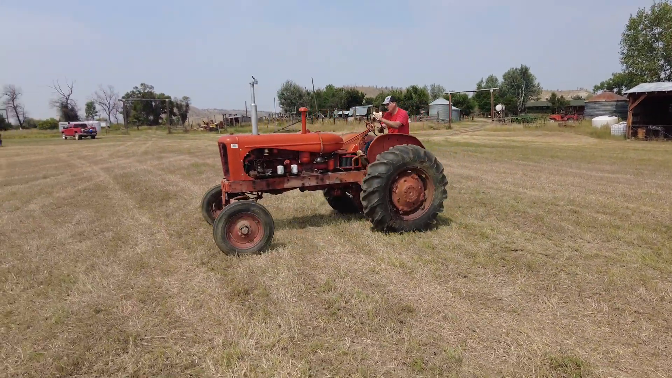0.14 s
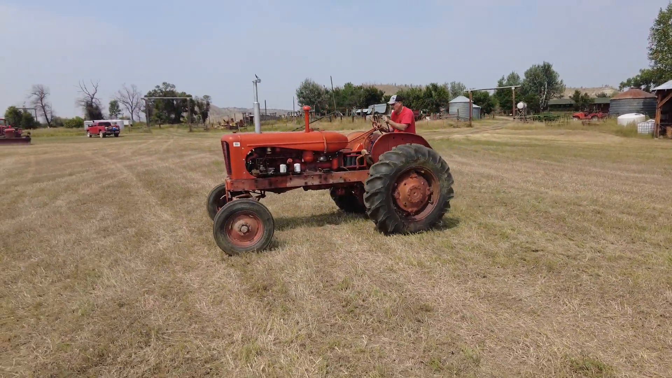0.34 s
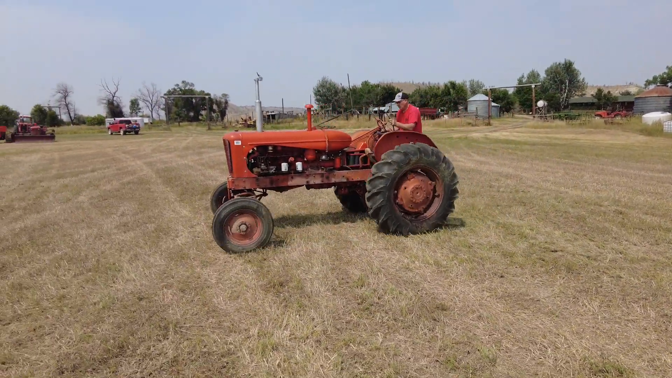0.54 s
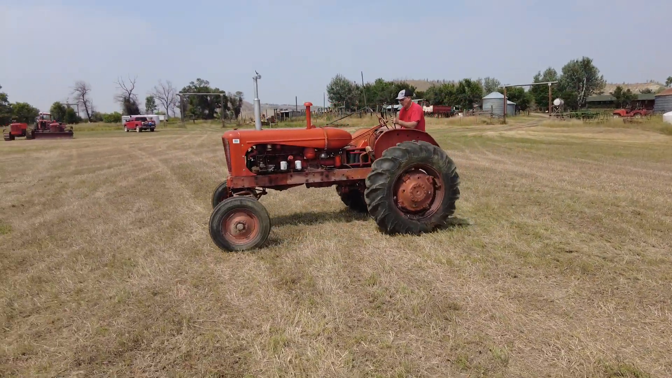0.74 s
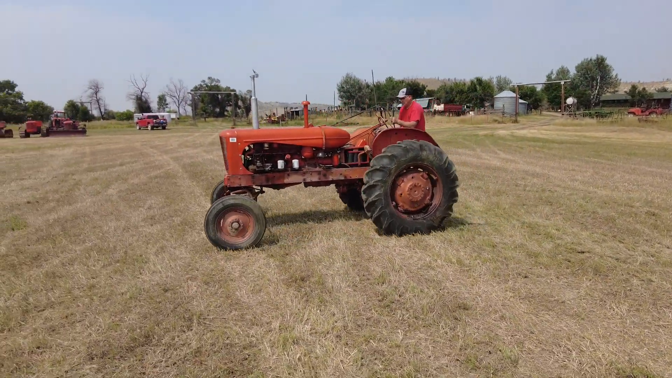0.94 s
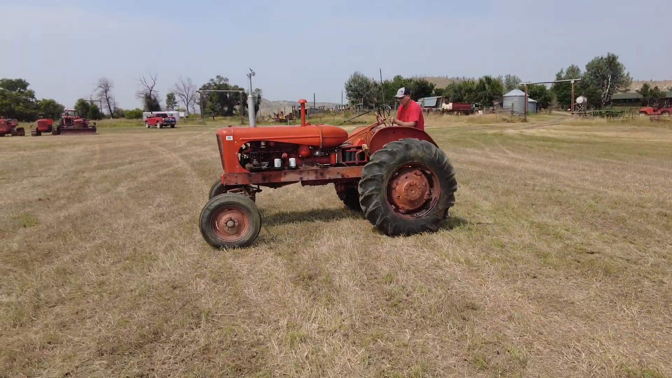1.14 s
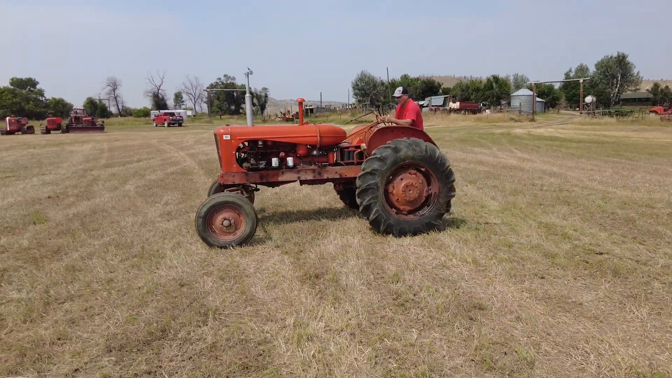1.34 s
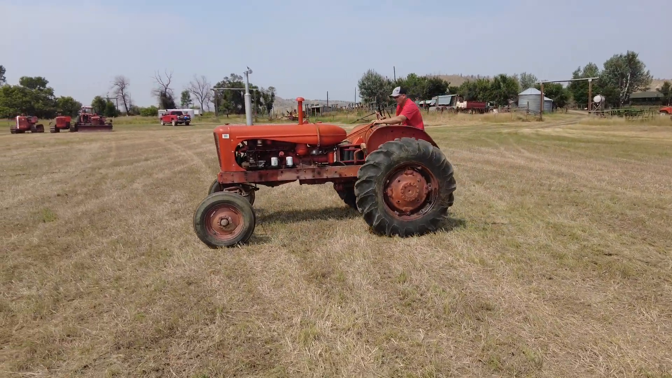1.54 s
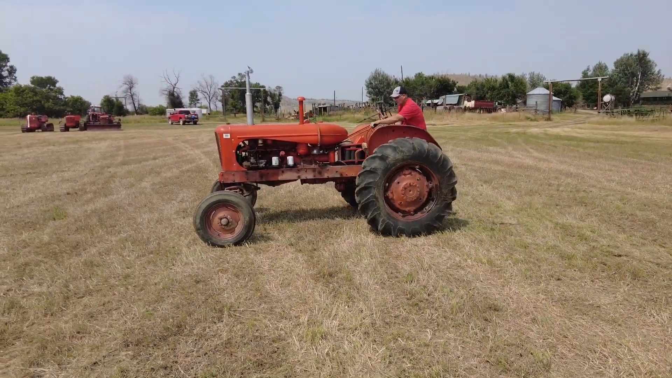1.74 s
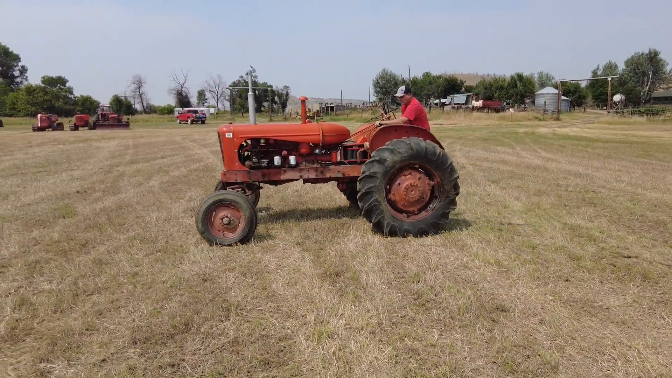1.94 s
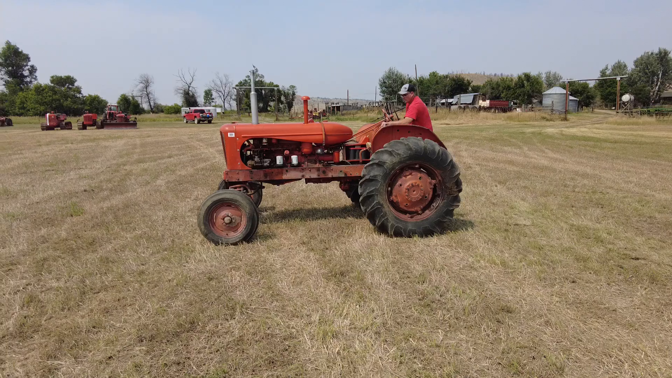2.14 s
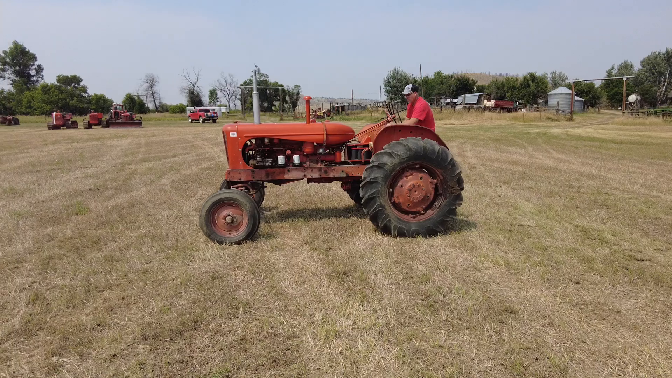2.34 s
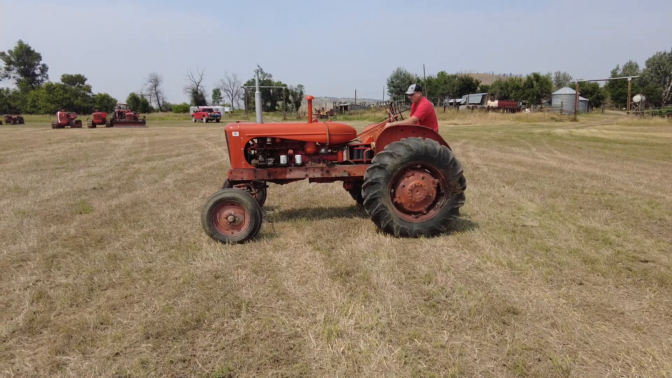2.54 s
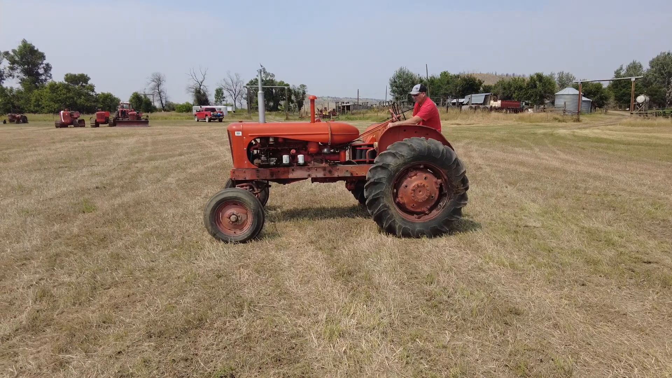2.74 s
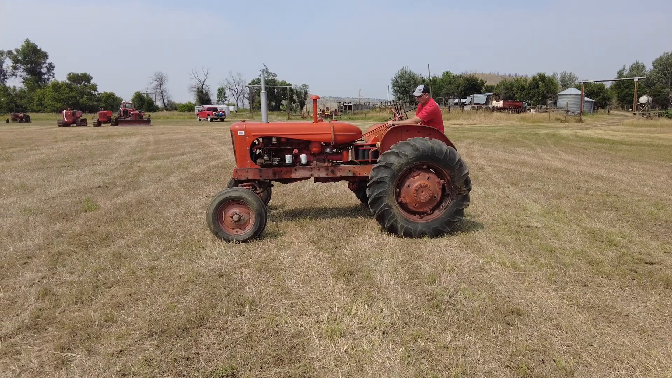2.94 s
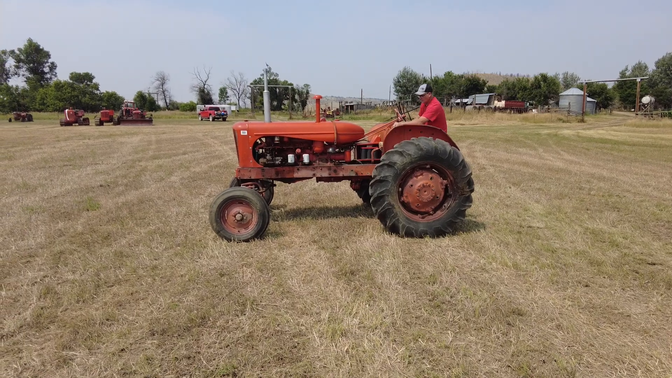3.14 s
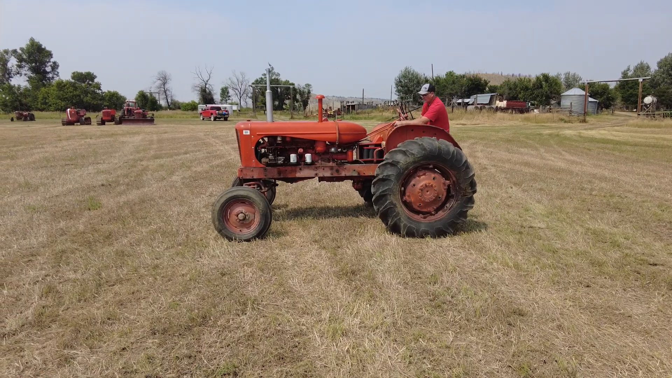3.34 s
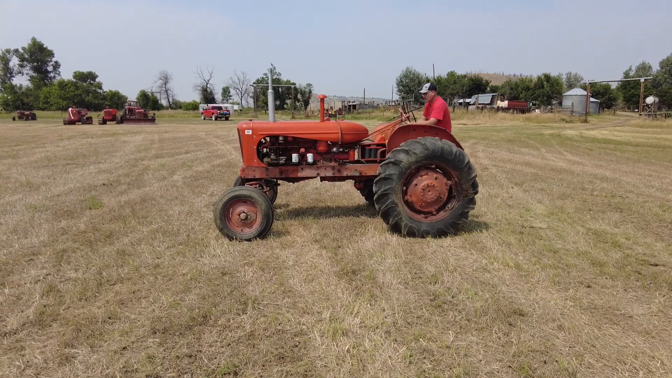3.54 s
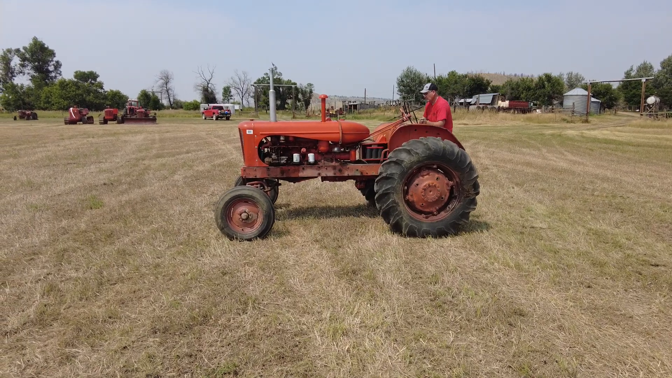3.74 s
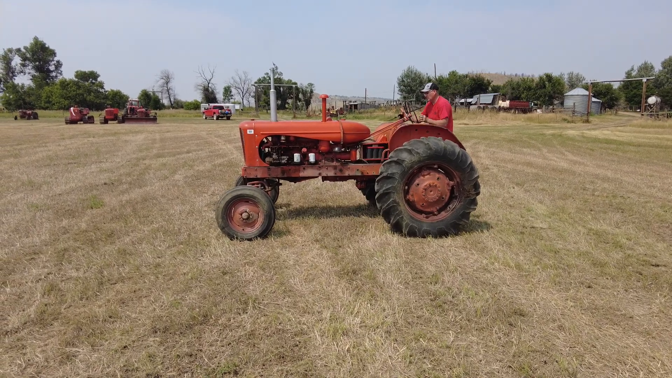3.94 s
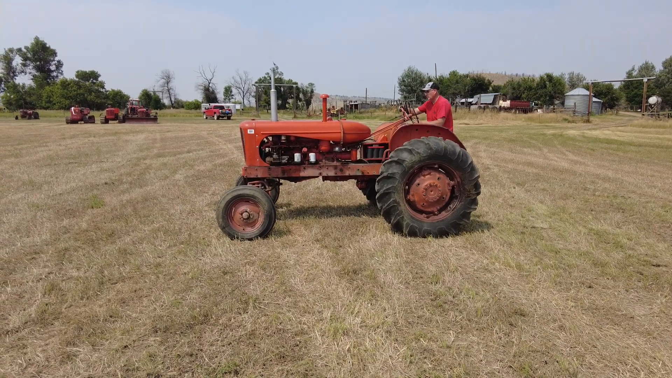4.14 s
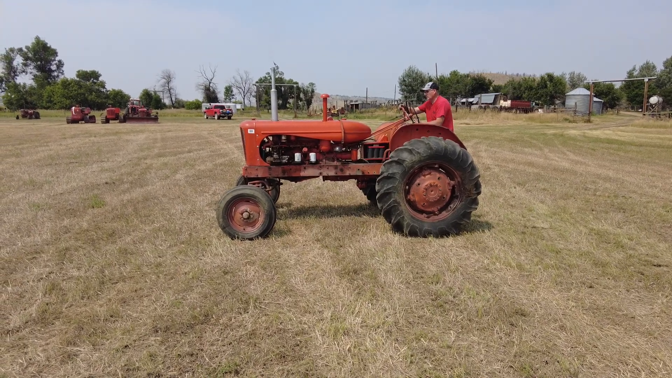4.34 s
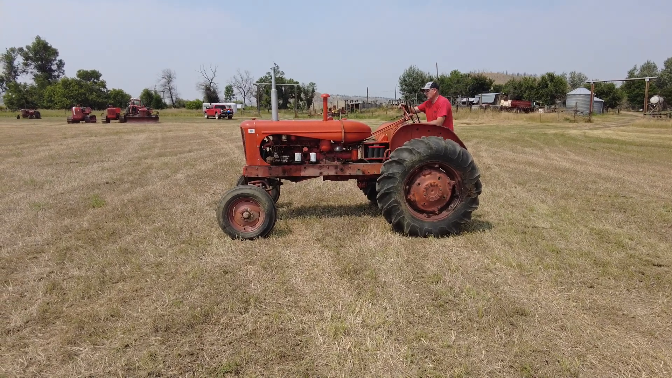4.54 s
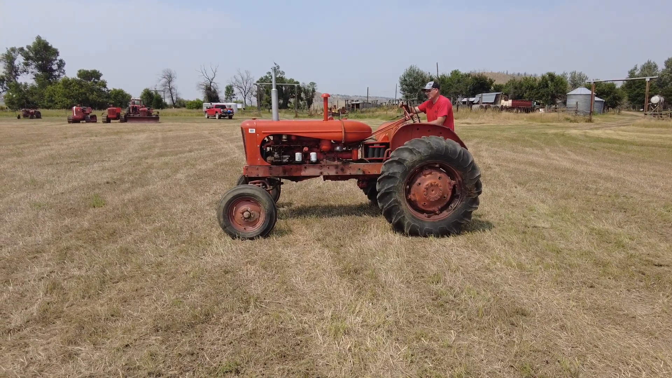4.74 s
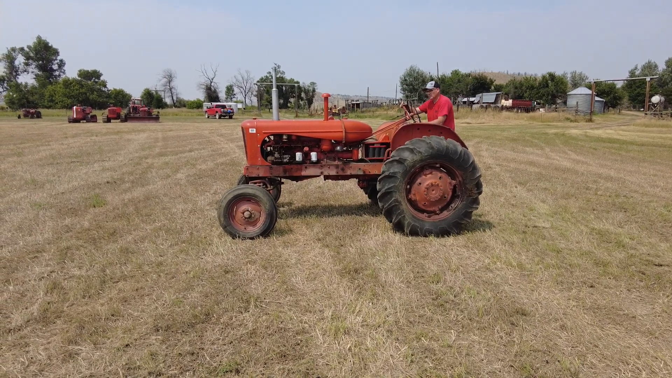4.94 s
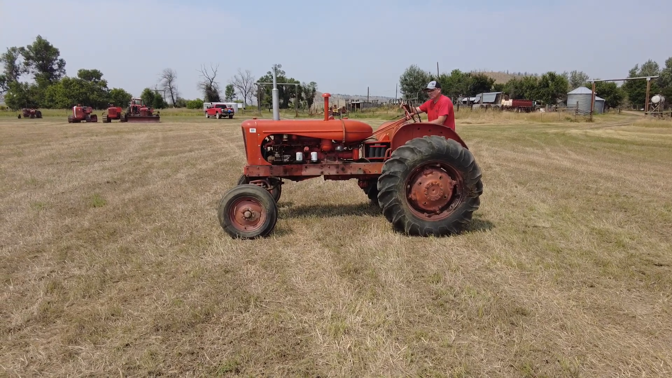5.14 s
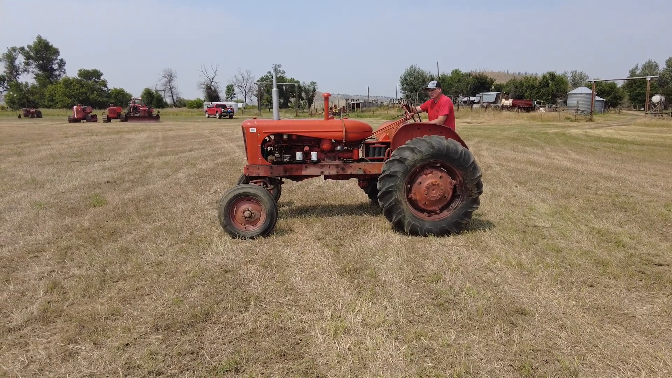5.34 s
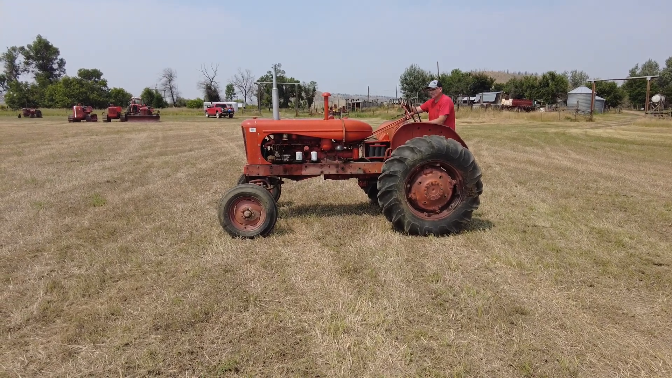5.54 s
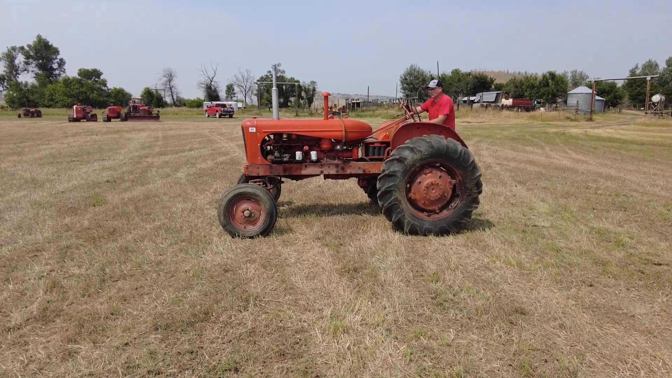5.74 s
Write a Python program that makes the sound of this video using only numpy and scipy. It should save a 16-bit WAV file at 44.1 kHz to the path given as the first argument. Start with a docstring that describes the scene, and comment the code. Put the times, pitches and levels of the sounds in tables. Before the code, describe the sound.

Fast, even engine chugging with hollow exhaust puffs and dense valve clatter, a few small metal chirps at the start. The speed holds, dips briefly just before four seconds, swells as it picks up, and cuts off at about four and a half. The crank then winds down, pumping air and clacking unevenly with dull driveline knocks. Open air, no echo, steady microphone distance.

```python
"""Old six-cylinder tractor, switched off

One crank drives it all: the exhaust throbs as sine lines on the cycle rate, over coloured gas noise.
Block, valve gear and light metal are noise bursts at fixed crank angles; a leaky gasket spits once a cycle.
The engine labours briefly, picks up again, then is switched off.
It runs down, the pistons pumping air and clacking one by one, with a few dull clunks and chirping fittings.
"""
import sys
import numpy as np
from scipy import signal
from scipy.fft import rfft, irfft, next_fast_len
from scipy.io import wavfile
from scipy.ndimage import uniform_filter1d

SR = 44100
rng = np.random.default_rng(int(sys.argv[2]) if len(sys.argv) > 2 else 0)


def master_out(mix):
    """Clip the mix to full scale and print it as 16-bit PCM to the path in sys.argv[1]."""
    frames = np.transpose(np.atleast_2d(mix))
    ceiling = np.clip(frames, -1, 1)
    pcm = np.round(ceiling * 32767).astype(np.int16)
    wavfile.write(sys.argv[1], SR, pcm)


N = 259704
T = np.arange(N) / SR

SET_RPM = 1045  # speed at which pace() is 0 dB
OFF_S, OFF_FADE_S = 4.54, 0.07  # switch-off, and time constant of the dying firings


def undb(db):
    """Decibels to gain."""
    return 10 ** (np.asarray(db) / 20)


def unit(x):
    """Scale to rms 1."""
    return x / np.sqrt(np.mean(x ** 2))


def noise():
    """White noise."""
    return rng.standard_normal(N)


def walk(rate):
    """Smooth random wander with rms 1, taking `rate` new values a second."""
    hold = int(SR / rate)
    steps = np.repeat(rng.standard_normal(N // hold + 1), hold)
    return unit(uniform_filter1d(steps, hold)[:N])


def response(x, gain_of_hz):
    """Filter by a gain that is a function of frequency."""
    size = next_fast_len(N + 8192)
    f = np.maximum(np.arange(size // 2 + 1) * SR / size, 1)
    return irfft(rfft(x, size) * gain_of_hz(f), size)[:N]


def spectrum(f, points):
    """Gain of a (Hz, dB) table on a log-frequency axis."""
    hz, db = np.transpose(points)
    return undb(np.interp(np.log(f), np.log(hz), db))


# Ringing panels of the bonnet and covers.
# Each row: resonance in Hz, width in Hz, lift in dB.
PANEL_RESONANCES = [(794, 39, 4.5), (940, 33, 1), (1107, 95, 2.5), (1725, 43, 3.5), (2104, 47, 3),
                    (2710, 57, 3.5), (3243, 76, 5), (5320, 570, 6.5), (8200, 180, 3.5)]


def colour(x, points):
    """Shape by a spectrum and the panel resonances, keeping the power of white noise."""
    def gain(f):
        lift = sum(db / (1 + (2 * (f - hz) / width) ** 2) for hz, width, db in PANEL_RESONANCES)
        return unit(spectrum(f, points) * undb(lift))
    return response(x, gain)


def taps(times, gains):
    """Single-sample impulses; those past the end are dropped."""
    samples = np.clip(times * SR, 0, N).astype(int)
    return np.bincount(samples, gains, N + 1)[:N]


def blows(cycle, table, scatter_db, jitter_s):
    """An impulse whenever the engine passes an angle of the table, each a little different."""
    angle, db = np.transpose(table)
    at = (np.arange(int(cycle[-1]) + 1)[:, None] + angle).ravel()
    chance = rng.standard_normal((len(at), 2))
    beyond = 2 * T[-1]  # angles that are never passed land past the end
    times = np.interp(at, cycle, T, left=beyond, right=beyond) + jitter_s * chance[:, 0]
    levels_db = np.resize(db, len(at)) + scatter_db * chance[:, 1]
    return taps(times, undb(levels_db))


def fade(decay_s, rise_s):
    """Envelope of one blow, peak 1."""
    t = T[:SR // 10]
    shape = np.exp(-t / decay_s) * (1 - np.exp(-t / rise_s))
    return shape / shape.max()


def burst(hits, shape):
    """Fresh noise under the envelope of every blow; overlapping blows add in power."""
    power = np.abs(signal.fftconvolve(hits ** 2, shape ** 2)[:N])
    return noise() * np.sqrt(power)


# The run of the engine, joined by straight lines.
# Each row: time in seconds, crank speed in rpm.
CRANK_SPEED = [(0, 1042), (.35, 1061), (.8, 1050), (1.3, 1041), (3, 1039), (3.75, 1046), (3.98, 992),
               (4.2, 1039), (4.45, 1075), (4.6, 1058), (4.8, 930), (5.4, 586), (5.89, 345)]


def crank_rpm():
    """Crank speed through the labouring dip, the pick-up and the run-down."""
    return np.interp(T, *np.transpose(CRANK_SPEED))


def pace(db_per_octave):
    """Gain of a moving part: it gets quieter with every halving of the crank speed."""
    return undb(db_per_octave * np.log2(crank_rpm() / SET_RPM))


def firing():
    """1 while the engine fires, dying away once it is switched off."""
    return np.exp(-np.maximum(T - OFF_S, 0) / OFF_FADE_S)


def effort(db_per_rpm):
    """Strength of the firings: the governor opens the throttle, a little late, when the speed sags."""
    governor_lag_s = 0.13
    sag_rpm = SET_RPM - np.interp(np.minimum(T, OFF_S) - governor_lag_s, T, crank_rpm())
    return firing() * undb(db_per_rpm * sag_rpm)


def labouring():
    """0 down to 570 rpm, then rising towards 1 as the crank slows and struggles over each compression."""
    return np.sqrt(np.clip(2 * (1 - crank_rpm() / 570), 0, 1))


def load(lift_db):
    """Gain that swells while the engine picks up again."""
    centre_s, half_length_s = 4.05, 0.23
    return undb(lift_db * np.exp(-((T - centre_s) / half_length_s) ** 2))


def drifting(make):
    """Two versions of a sound that slowly trade places."""
    angle = 0.9 * T + rng.uniform(0, 2 * np.pi)  # radians
    return np.cos(angle) * make() + np.sin(angle) * make()


def grind(cycle):
    """Gear teeth and chains: a rough texture that comes round again with every cycle."""
    size = int(120 * SR / SET_RPM)  # samples in one cycle of two crank turns
    texture = rng.standard_normal(size)
    return texture[(cycle * size).astype(int) % size] * np.sqrt(crank_rpm() / SET_RPM)


def clatter(cycle, table, scatter_db, decay_s, rise_s, wash_db, repeat):
    """Metal blows or puffs over a wash: power share `repeat` recurs each cycle, the rest is always new."""
    shape = fade(decay_s, rise_s)

    def ringing(hits):
        one_ring = shape * rng.standard_normal(len(shape))  # the same noise for every hit
        return signal.oaconvolve(hits, one_ring)[:N]

    parts = [blows(cycle, [row], scatter_db, jitter_s=0.00002) for row in table]
    ring = sum(drifting(lambda: ringing(hits)) for hits in parts)
    wash = undb(wash_db) * pace(db_per_octave=1.5)
    same = unit(ring) + wash * drifting(lambda: grind(cycle))
    fresh = unit(burst(sum(parts), shape)) + wash * noise()
    return unit(np.sqrt(repeat) * same + np.sqrt(1 - repeat) * fresh)


def flutter(x, rate, depth_db, count=9):
    """Each treble band flickers on its own, so the colour of the ticks keeps changing."""
    centres = np.geomspace(3500, 15000, count)  # Hz
    out = 0
    for band in np.eye(count):
        part = response(x, lambda f: np.interp(f, centres, band))
        out = out + part * undb(depth_db * walk(rate))
    return out


def fan(cycle):
    """Fan blades hum just above six and twelve times the cycle rate, beating slowly with the exhaust."""
    blade = 2 * np.pi * (6.151 * cycle - 0.17)
    hum = np.cos(blade) - undb(-3.5) * np.cos(2 * blade)
    return np.sqrt(2) * hum * undb(-53.5) * pace(db_per_octave=20)


# Tappet blows, played by the light metal and by the valve cover.
# Each row: turn of the cycle from 0 to 1, relative level in dB.
TAPPET_BLOWS = [(.015, -1.5), (.075, 0), (.18, 0.5), (.24, 2.5), (.35, .5), (.405, 0.5), (.495, 1.5),
                (.565, 1.5), (.68, 1.5), (.76, 1), (.84, 2), (.925, 2.5)]
# Colour of the light metal and belt hiss. Each row: frequency in Hz, relative level in dB per Hz.
METAL_COLOUR = [(2500, -10.5), (3800, 10.5), (4700, 5), (5250, 0.5), (5900, 3), (6500, -0.5), (7350, -5),
                (7700, 5), (8300, -4), (9200, 0.5), (10100, -8), (15500, -9.5)]


def light_metal(cycle):
    """Light metal clicks with the tappets over belt hiss, the treble flickering."""
    clicks = clatter(cycle, TAPPET_BLOWS, scatter_db=2.5, decay_s=0.0062, rise_s=0.0011,
                     wash_db=0, repeat=0.25)
    metal = colour(clicks, METAL_COLOUR) * undb(-67.5) * pace(db_per_octave=7.5)
    return flutter(metal, rate=90, depth_db=2.5)


# Colour of the gasket spit. Each row: frequency in Hz, relative level in dB per Hz.
GASKET_COLOUR = [(2000, -41), (3700, 8), (5200, 0), (6200, 2), (7200, 7.5), (7800, 9), (8500, 2),
                 (9500, -5.5), (11000, -19), (15500, -49)]


def gasket_spit(cycle):
    """One leaky cylinder spits gas once a cycle while it fires, harder under load."""
    hits = blows(cycle, [(0.971, 0)], scatter_db=1.7, jitter_s=0.00034)
    spit = unit(burst(hits, fade(decay_s=0.0029, rise_s=0.007)))
    leak = colour(spit, GASKET_COLOUR) * undb(-71.5) * firing() * load(lift_db=4.5)
    return flutter(leak, rate=22, depth_db=1.9)


# Thin, sharp ticks. Each row: turn of the cycle from 0 to 1, relative level in dB.
SHARP_TICKS = [(.425, 2), (.735, 1), (.84, -10)]
# Colour of the ticks. Each row: frequency in Hz, relative level in dB per Hz.
TICK_COLOUR = [(6000, -28), (10000, -7), (14000, 1), (15500, 4)]


def sharp_ticks(cycle):
    """Thin, sharp noise ticks at fixed crank angles, quieter as the crank slows."""
    hits = blows(cycle, SHARP_TICKS, scatter_db=6.0, jitter_s=0.0003)
    ticks = unit(burst(hits, fade(decay_s=0.0035, rise_s=0.0004)))
    return colour(ticks, TICK_COLOUR) * undb(-80.5) * pace(db_per_octave=19)


# Chirps of loose fittings, and one low clunk ring at the end.
# Each row: start in seconds, starting pitch in Hz, level in dB.
SHORT_RINGS = [(.027, 2090, -52), (.083, 2050, -57), (.124, 5200, -68), (.14, 2106, -56),
               (.198, 5270, -58.5), (.2, 2240, -53), (.255, 2110, -50.5), (.37, 2070, -53),
               (.455, 5100, -61), (.577, 5250, -63), (3.931, 11550, -67), (5.33, 5130, -68),
               (5.355, 5150, -64), (5.767, 5500, -71), (5.85, 695, -52)]


def short_rings():
    """Loose fittings chirp and one low clunk rings: each ring is a little rough and sags in pitch."""
    sag_hz_per_s = 4100
    out = 0
    for s, hz, db in SHORT_RINGS:
        hit = taps(np.array([s]), [undb(db)])
        swell = signal.oaconvolve(hit, fade(decay_s=0.0066, rise_s=0.007))[:N]
        age = T - s
        phase = 2 * np.pi * (hz * age - sag_hz_per_s * age ** 2 / 2)
        out = out + swell * (1 + 0.3 * walk(200)) * np.sin(phase + 0.6 * walk(200))
    return out


# Jolts of a thin fitting. Each row: turn of the cycle from 0 to 1, relative level in dB.
FITTING_JOLTS = [(.075, 4), (.865, -3)]
# Its free shake in the run-down: centre in seconds, half length in seconds, middle level in dB.
FREE_SHAKE = (5.33, 0.059, -80)
# Colour of the fitting. Each row: frequency in Hz, relative level in dB per Hz.
FITTING_COLOUR = [(4200, -45), (4850, -8), (5100, -1), (5500, -5), (6500, -42)]


def jingle(cycle):
    """A thin fitting is jolted twice a cycle while firing, and shakes freely for a moment in the run-down."""
    hits = blows(cycle, FITTING_JOLTS, scatter_db=1.5, jitter_s=0.0004)
    jolts = unit(burst(hits, fade(decay_s=0.0072, rise_s=0.0012)))
    s, half_length_s, db = FREE_SHAKE
    shaking = np.exp(-((T - s) / half_length_s) ** 2) * undb(db + 3.6 * walk(60))
    return colour(jolts * undb(-77) * firing() + noise() * shaking, FITTING_COLOUR)


# Colour of the valve cover. Each row: frequency in Hz, relative level in dB per Hz.
COVER_COLOUR = [(700, -4), (1200, -1.5), (1450, 2), (1850, 1), (2080, 3), (2500, 2), (3000, 3), (3250, 1.5),
                (3500, -4), (4000, -26), (6000, -39), (12000, -40)]
# The slackest tappets. Each row: turn of the cycle from 0 to 1, relative level in dB.
SLACK_BLOWS = [(0.44, -2), (0.739, -3), (0.849, -1)]
# Colour of their taps. Each row: frequency in Hz, relative level in dB per Hz.
SLACK_TAP_COLOUR = [(800, -33), (1400, 5), (2100, -6), (3200, -7), (4200, -43)]


def valves(cycle):
    """Twelve tappets rattle the valve cover; the slackest ones tap sharply."""
    rattle = clatter(cycle, TAPPET_BLOWS, scatter_db=1.5, decay_s=0.0058, rise_s=0.0017,
                     wash_db=0.5, repeat=0.68)
    slack_hits = blows(cycle, SLACK_BLOWS, scatter_db=1.0, jitter_s=0.00013)
    slack = unit(burst(slack_hits, fade(decay_s=0.0019, rise_s=0.00026)))
    cover = colour(rattle, COVER_COLOUR) * undb(-55.5)
    sharp = colour(slack, SLACK_TAP_COLOUR) * undb(-68)
    return (cover + sharp) * pace(db_per_octave=10.5)


# Knocks inside the block. Each row: turn of the cycle from 0 to 1, relative level in dB.
BLOCK_KNOCKS = [(.017, -0.5), (.08, -2.5), (.118, -2), (.23, 1), (.255, -2), (.31, -2.5), (.348, -3),
                (.43, -4), (.475, -3), (.53, -3), (.578, -2.5), (.628, -3), (.683, -2), (.74, -2.5),
                (.765, -2.5), (.843, -1.5), (0.906, -4), (.948, -4)]
# Dull driveline clunks. Each row: start in seconds, decay in seconds, level in dB.
DRIVELINE_CLUNKS = [(5.16, .008, -58), (5.193, 0.0065, -55.5), (5.315, .008, -55), (5.489, 0.005, -59),
                    (5.52, 0.0047, -58), (5.598, .009, -58), (5.722, 0.058, -56.5), (5.843, 0.023, -54),
                    (5.873, .03, -52)]
# Colour of the block. Each row: frequency in Hz, relative level in dB per Hz.
IRON_COLOUR = [(150, -5.5), (280, -8), (400, -9), (520, -4), (680, 0), (820, -1.5), (900, 0.5), (1000, 1.5),
               (1130, -5), (1300, -8), (1800, -15), (4000, -45.5)]


def block(cycle):
    """Pistons and gears knock in the block, harder under load; the driveline clunks as it runs down."""
    knocks = clatter(cycle, BLOCK_KNOCKS, scatter_db=0.53, decay_s=0.0075, rise_s=0.00065,
                     wash_db=-1.0, repeat=0.68)
    knocks = knocks * undb(-50.5) * load(lift_db=2.0) * pace(db_per_octave=7.5)
    clunks = 0
    for s, decay_s, db in DRIVELINE_CLUNKS:
        hit = taps(np.array([s]), [undb(db)])
        clunks = clunks + burst(hit, fade(decay_s, rise_s=0.0072))
    return colour(knocks + clunks, IRON_COLOUR)


# The last compressions, heard one by one. Each row: start in seconds, level in dB.
LAST_COMPRESSIONS = [(5.066, -61), (5.121, -66), (5.158, -70), (5.186, -64), (5.206, -57.5), (5.236, -60),
                     (5.274, -61), (5.293, -64), (5.333, -60), (5.361, -58), (5.394, -57.5), (5.408, -59),
                     (5.434, -64), (5.478, -58.5), (5.501, -59.5), (5.555, -59.5), (5.595, -53),
                     (5.629, -59.5), (5.678, -60.5), (5.73, -60.5), (5.772, -60.5), (5.826, -58.5),
                     (5.871, -61)]
# Colour of the clacks. Each row: frequency in Hz, relative level in dB per Hz.
COMPRESSION_COLOUR = [(600, -11), (1100, 3.5), (1600, -1), (2200, -0.5), (2800, 4), (3400, -7.5),
                      (4200, -14), (12000, -46)]


def compressions():
    """As the engine runs down, each compression clacks on its own as a noise burst."""
    s, db = np.transpose(LAST_COMPRESSIONS)
    clacks = burst(taps(s, undb(db)), fade(decay_s=0.0099, rise_s=0.007))
    return colour(clacks, COMPRESSION_COLOUR)


# Low resonances of the pipe that the pumped air excites. Each row: frequency in Hz, gain in dB.
PIPE_BOOM = [(24, -22), (31, -2.5), (36, 5), (45, -2.5), (53, -1.5), (62, 1), (85, 0), (105, 1.5),
             (160, 0.5)]


def air_pump(cycle):
    """Air pulses at twelve valve openings a cycle and, unfired, six piston strokes, booming in the pipe."""
    uneven = 0.017 * labouring() * walk(25)  # the slow crank turns unevenly
    stroke = 2 * np.pi * 6 * (cycle - 0.066 + uneven)
    unfired = (undb(1.5) * np.cos(stroke) + undb(-8.5) * np.cos(3 * stroke)) * (1 - firing())
    pulses = -(unfired + np.cos(2 * stroke))
    boom = response(pulses, lambda f: spectrum(f, PIPE_BOOM))
    weakening_db = 1.5 * labouring()
    return np.sqrt(2) * boom * undb(-48 - weakening_db) * pace(db_per_octave=5.0)


# Puffs from the stack. Each row: turn of the cycle from 0 to 1, relative level in dB.
STACK_PUFFS = [(0.089, -2.5), (0.32, -2.5), (.82, -1.5)]
# Colour of the puffs. Each row: frequency in Hz, relative level in dB per Hz.
PUFF_COLOUR = [(130, -21), (200, 8.5), (270, 8.5), (400, -7.5), (700, -25), (3000, -80)]


def chuffs(cycle):
    """Hollow puffs from the stack, much alike from cycle to cycle, following the throttle."""
    puffs = clatter(cycle, STACK_PUFFS, scatter_db=1.5, decay_s=0.0099, rise_s=0.0042,
                    wash_db=-22, repeat=0.85)
    return colour(puffs, PUFF_COLOUR) * undb(-62.5) * effort(db_per_rpm=0.1057)


# Exhaust lines. Each row: multiple of the four-stroke cycle rate, relative level in dB.
EXHAUST_LINES = [(2, -38), (3, -7), (4, 3), (5, -10), (6, 6.5), (7, -8.5), (8, -17), (9, -7), (10, -3.5),
                 (11, -8), (13, -44), (14, -8.5), (15, -11), (16, -38), (17, -14), (18, -8.5), (20, -19.5),
                 (22, -30), (23, -28.5)]
# Colour of the gas rumble. Each row: frequency in Hz, relative level in dB per Hz.
GAS_COLOUR = [(10, -2), (22, -8), (50, 5.5), (105, 4.5), (160, 1.5), (250, -5), (350, -15.5), (600, -53)]


def exhaust(cycle):
    """Unequal firings give lines at multiples of the cycle rate; turbulent gas rumbles between them."""
    after_firing = cycle - 0.012 + 0.00036 * walk(40)
    throb = 0
    for multiple, db in EXHAUST_LINES:
        k = round(multiple)
        late = 0.025 * (k % 2)  # one cylinder breathes late: the odd multiples lag
        pipe_lag = 0.5 * np.arctan(k - 5)  # phase turn of a silencer resonance near the fifth multiple
        line = np.sin(2 * np.pi * k * (after_firing - late) - pipe_lag)
        throb = throb + np.sqrt(2) * undb(db) * line
    surge = 1 + 0.2 * np.cos(2 * np.pi * 2 * (cycle - 0.33))  # twice a cycle
    gas = colour(noise() * surge, GAS_COLOUR)
    throb = throb * undb(-47) * effort(db_per_rpm=0.0783)
    return throb + gas * undb(-51) * pace(db_per_octave=4.0)


# Stereo width. Each row: frequency in Hz, level of the left-right difference in dB.
STEREO_WIDTH = [(2200, -117), (3300, -13.5), (5000, -4.5), (8000, -12), (11000, -3.5), (15500, -2)]


def treble_side(cycle):
    """Left-right difference: independent treble of the light metal, gasket and valves."""
    treble = light_metal(cycle) + gasket_spit(cycle) + valves(cycle)
    return response(treble, lambda f: spectrum(f, STEREO_WIDTH))


# Opening colour, a little louder and fuller in the low middle.
# Each row: frequency in Hz, lift at the start in dB.
OPENING_LIFT = [(60, 2.5), (160, 1.5), (260, -1), (340, 0), (430, 6), (600, 3.5), (850, 1), (2500, 2),
                (6000, 1.5), (9000, 3), (14000, 2)]


def settle(ear):
    """The opening colour gives way smoothly to the plain sound."""
    early = np.exp(-T / 0.83)
    opening = response(ear, lambda f: spectrum(f, OPENING_LIFT))
    return (1 - early) * ear + early * opening


def scene():
    """One crank drives the engine parts; only the treble differs between the ears."""
    cycle = np.cumsum(crank_rpm()) / (120 * SR) + 0.98  # four-stroke cycles of two crank turns
    mid = fan(cycle) + light_metal(cycle) + gasket_spit(cycle) + sharp_ticks(cycle)
    mid = mid + short_rings() + jingle(cycle) + valves(cycle) + block(cycle)
    mid = mid + compressions() + air_pump(cycle) + chuffs(cycle) + exhaust(cycle)
    side = treble_side(cycle)
    return np.array([settle(mid + side), settle(mid - side)])


def record(dry):
    """A steep elliptic low-pass cuts the top above 15550 Hz."""
    return signal.sosfilt(signal.ellip(10, 0.2, 80, 15550, fs=SR, output="sos"), dry)


dry = scene()
out = record(dry)
master_out(out)
```